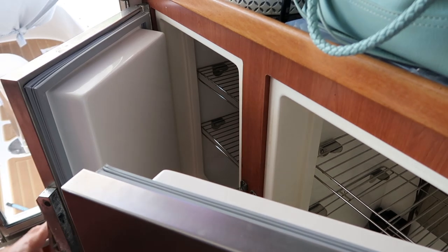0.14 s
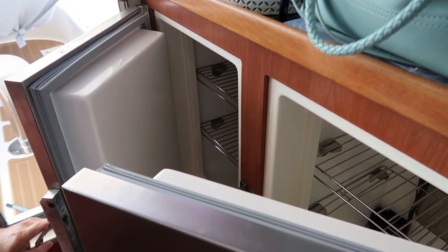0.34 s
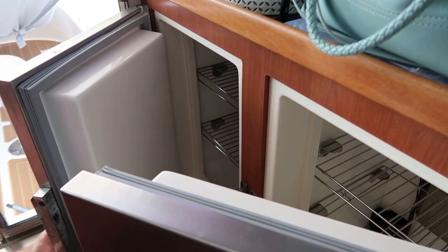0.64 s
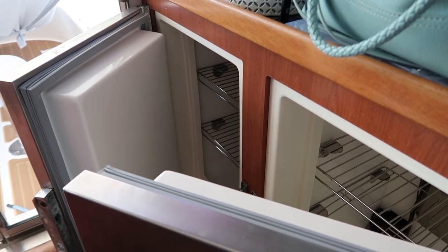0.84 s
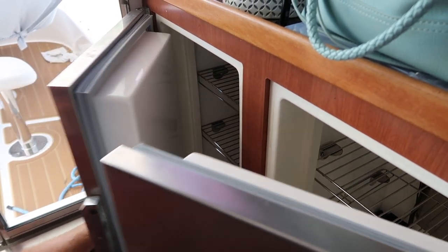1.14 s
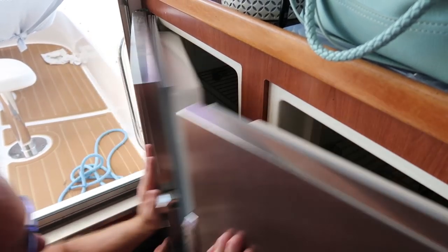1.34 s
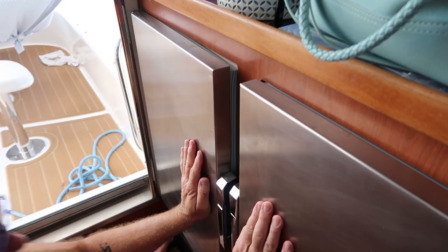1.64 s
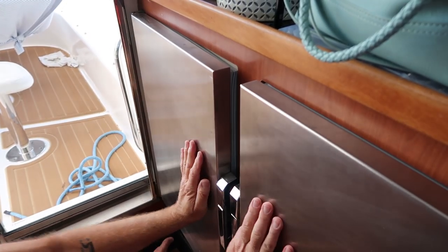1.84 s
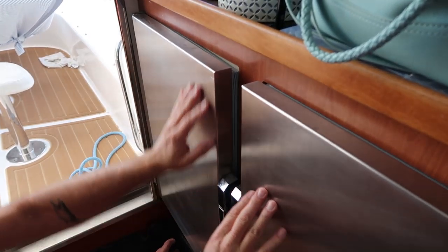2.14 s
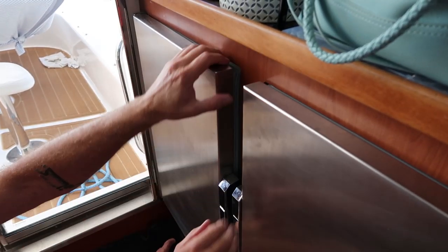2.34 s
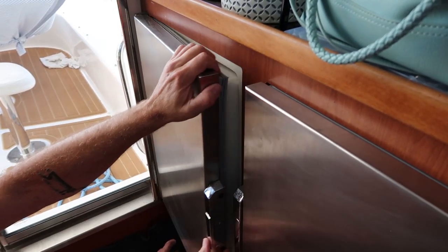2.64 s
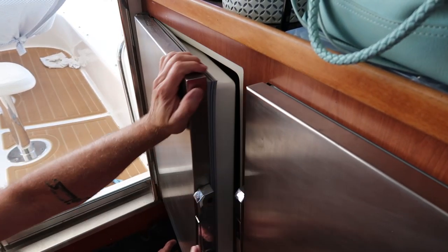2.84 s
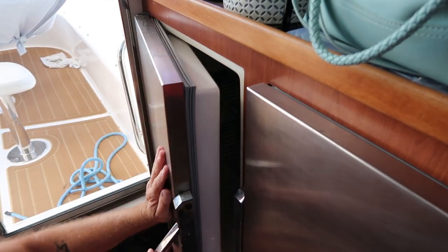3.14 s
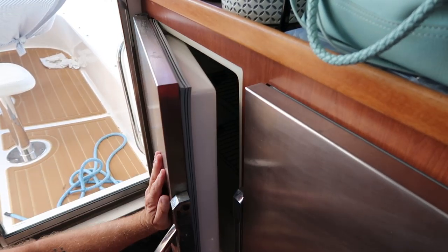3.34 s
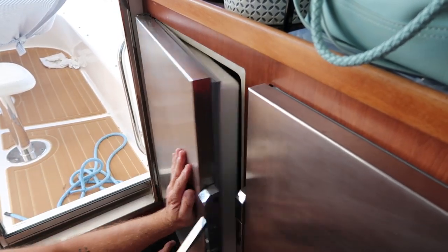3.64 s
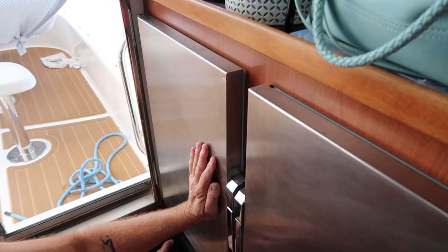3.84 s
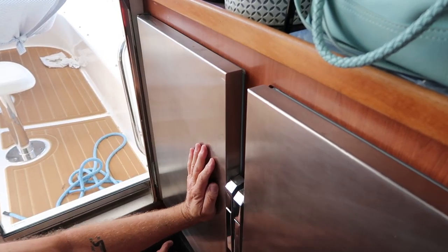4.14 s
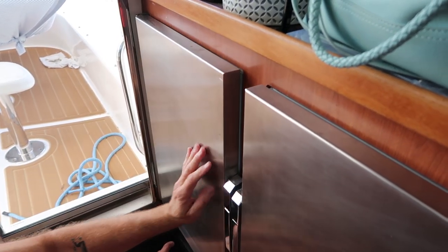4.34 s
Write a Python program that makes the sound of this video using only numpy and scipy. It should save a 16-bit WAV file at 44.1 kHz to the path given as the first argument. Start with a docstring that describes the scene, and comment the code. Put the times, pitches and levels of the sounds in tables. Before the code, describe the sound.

Low hum, soft airy rush and a very faint high whine fill a tight cabin. Latches click twice, then fridge doors slam with a boomy, distorted thud that makes the background dip. Later one latch is released with a bright click, the handle knocks lightly, a palm brushes the metal, and the door bangs shut, all very close and short, with little echo.

```python
"""A small wooden boat cabin with two steel-faced fridge doors: their latches snap, both doors are pushed shut
against stiff seals, then one is unlatched, swung open and shut again. Blows are damped ringing and noise bursts;
rubbing, a sliding hand, a low hum, a steady rush and a faint whine are shaped noise.
Loud blows overload the close microphone; the recorder's gain control ducks and lets the cabin swell slowly back."""
import sys
import numpy as np
from scipy import signal
from scipy.fft import rfft, irfft, next_fast_len
from scipy.io import wavfile

SR = 44100
rng = np.random.default_rng(int(sys.argv[2]) if len(sys.argv) > 2 else 0)


def materialize(psi):
    """Save the field psi as 16-bit PCM at rate SR to the path in sys.argv[1].

    A 1-D psi becomes a single channel; in a 2-D psi each row is a channel.
    """
    bounded = np.clip(np.atleast_2d(psi).T, -1, 1)
    quanta = np.round(bounded * 32767).astype(np.int16)
    wavfile.write(sys.argv[1], SR, quanta)


N = 197523
T = np.arange(SR // 3) / SR  # time within one blow, in seconds


def amp(db):
    """Turn decibels into a gain."""
    return 10 ** (np.asarray(db) / 20)


def unit(x):
    """Scale to rms 1."""
    return x / np.sqrt(np.mean(x ** 2) + 1e-20)


def blow(x):
    """Scale a blow to rms 0.1 over its third of a second, so that all blows start with equal energy."""
    return unit(x) / 10


def along(points, hz):
    """Read a curve of (f/Hz, value) points on a logarithmic frequency axis."""
    f, v = np.transpose(points)
    return np.interp(np.log(hz + 1), np.log(f), v)


def filtered(x, response):
    """Weight each frequency of x by the given response."""
    n = x.shape[-1]
    size = next_fast_len(n + 1024, True)
    hz = np.fft.rfftfreq(size, 1 / SR)
    return irfft(rfft(x, size) * response(hz), size)[..., :n]


def turn(hz):
    """Angle that sets how much of a sound the two channels share and how much is opposed."""
    # left-right likeness, from 1 (same) to below 0 (opposed): f/Hz, likeness
    likeness = [(300, 1), (1400, 0.97), (3100, .65), (6800, -.02), (10000, -0.46), (15000, -0.44)]
    return np.arccos(np.clip(along(likeness, hz), -1, 1)) / 2


def noise(spectrum, size, tilt_db=0):
    """Coloured stereo noise of rms 1: alike in the bass, spread wide in the treble."""
    def shared_and_opposed(hz):
        colour = amp(along(spectrum, hz) + tilt_db * np.log2(hz + 1))  # tilt in dB per octave
        return colour * [np.cos(turn(hz)), np.sin(turn(hz))]

    mid, side = filtered(rng.standard_normal((2, size)), shared_and_opposed)
    return unit(np.array([mid + side, mid - side]))


def ring(modes):
    """A struck object sounds many fading tones; the higher ones reach the two channels out of phase."""
    hz, db, t60 = np.transpose(modes)
    gain = amp(db + rng.standard_normal(len(hz)))  # each blow excites the tones a little differently
    lead = turn(hz) * rng.choice([-1, 1], len(hz))
    decay = np.log(1000) / t60  # a fall of 60 dB in t60 seconds
    waves = np.exp(np.outer(2j * np.pi * hz - decay, T).astype(np.complex64))
    starts = gain * np.exp(1j * np.array([lead, -lead]))
    return blow((starts @ waves).imag)


def add(track, s, x):
    """Mix x into the track from time s, in seconds."""
    part = track[:, round(s * SR):][:, :len(T)]
    part += x[..., :part.shape[1]]


def gestures(rows, attack_s, release_s):
    """Gain over time of (t/s, length/s, level/dB) events that rise before t, hold and fade."""
    t = np.arange(N) / SR
    gain = np.zeros(N)
    for s, length, db in rows:
        corners = [s - attack_s, s, s + length, s + length + release_s]
        gain += amp(db) * np.interp(t, corners, [0, 1, 1, 0])
    return gain


def lagged(x, seconds):
    """Smooth x so that it follows changes with the given time constant."""
    keep = np.exp(-1 / (seconds * SR))
    return signal.lfilter([1 - keep], [1, -keep], x)


def cabin(x, onset_s=0.0027):
    """Add the short answer of the wooden cabin: noise that dies away at its own pace at each pitch."""
    # how long the answer takes to fall by 60 dB: f/Hz, t60/s
    fade_times = [(80, 0.5), (250, 0.19), (1000, 0.2), (4000, 0.17), (12000, 0.17)]
    # strength of the reflected sound: f/Hz, level/dB
    walls = [(60, -13), (200, -4), (450, -5.5), (900, -7.5), (2000, -6), (6000, -9), (13000, -5.5)]
    hiss = noise([(20, 0.0078), (20000, 0)], len(T))  # practically white
    hz, t, bands = signal.stft(hiss, SR, nperseg=256)
    fade = amp(-60 * t / along(fade_times, hz)[:, None])
    tail = signal.istft(bands * fade, SR, nperseg=256)[1][:, :len(T)]
    build_up = 1 - np.exp(-(T / onset_s) ** 2)
    tail = unit(tail * build_up) / np.sqrt(len(T))
    tail = filtered(tail, lambda hz: amp(along(walls, hz)))
    # the left channel alone excites the answer, which is stereo
    return x + signal.fftconvolve(x[:1], tail, axes=1)[:, :len(T)]


def rush(level_db=-36.5):
    """A steady rush: noise strongest in the bass and lower middle."""
    # colour of the rush: f/Hz, level/dB
    rush_colour = [(53, -34), (90, -6), (220, -1.5), (323, -4.5), (352, -4.5), (452, -8), (501, -8.5),
                   (606, -12), (712, -6.5), (767, -13.5), (1110, -11), (1380, -16.5), (1510, -15.5),
                   (1740, -19.5), (3000, -25.5), (3900, -53), (6600, -120)]
    return amp(level_db) * noise(rush_colour, N)


def hiss_and_whine(level_db=-51, whine_db=-16):
    """A steady treble hiss, joined by a whine made of a narrow band of noise."""
    # colour of the hiss: f/Hz, level/dB
    hiss_colour = [(1290, -36.5), (2200, -3.5), (2750, -12), (3090, -4.5), (3290, -5), (3930, -8.5),
                   (4700, -4.5), (5360, -9), (6660, -9.5), (8530, -13.5), (12100, -11), (13100, -23.5),
                   (14000, -41)]
    # narrow peak of the faint whine: f/Hz, level/dB
    whine_colour = [(6300, -47), (6470, -15.5), (6525, 5), (6580, -13), (6750, -45), (7500, -120)]
    treble = noise(hiss_colour, N) + amp(whine_db) * noise(whine_colour, N)
    return amp(level_db) * treble


def hum(level_db=-39):
    """A low hum of narrow bass noise that swells as the doors are handled."""
    # colour of the hum: f/Hz, level/dB
    hum_colour = [(20, -30.5), (35, -24), (46, -6), (55, -4), (64, -1), (80, -33.5), (130, -23.5),
                  (250, -74)]
    # hum added while a door is handled: t/s, length/s, level/dB relative to the steady hum
    swells = [(0.0, 0.36, 2.5), (0.64, 0.25, 5.5), (2.78, 0.18, -17)]
    gain = 1 + gestures(swells, attack_s=0.031, release_s=0.04)
    return amp(level_db) * gain * noise(hum_colour, N)


def brush():
    """Skin slides over the steel with a faint, airy hiss."""
    # a hand sliding on the steel face: t/s, length/s, level/dB
    strokes = [(0.92, 0.11, -55), (2.12, 0.15, -58), (3.08, 0.098, -47.5)]
    level = gestures(strokes, attack_s=0.083, release_s=0.27)
    return level * noise([(4000, -16), (8000, -10.5), (11500, -2), (13000, -6), (14500, -25.5)], N)


def hinge():
    """The hinge sings faintly as the open door shifts: a soft, narrow rubbing tone near 715 Hz."""
    # the hinge's sound: t/s, length/s, level/dB
    hinge_moves = [(0.13, 0.073, -44.5)]
    level = gestures(hinge_moves, attack_s=0.03, release_s=0.038)
    return level * noise([(600, -80), (690, -26), (715, 15), (740, -18), (850, -72)], N)


def scuffs():
    """Seals and latch tongues rub harder and harder until they seat."""
    # rubbing that swells into a contact: end t/s, rise/s, level/dB, brightness/dB per octave
    rubs = [(0.332, .012, -28.5, 2), (0.6624, .018, -20.5, 5.5), (1.543, .03, -7.5, -1),
            (2.5915, 0.0096, -19, 2), (3.847, 0.054, -19, -4.5)]
    out = np.zeros((2, N))
    for end, rise, db, tilt_db in rubs:
        swell = amp(30 * np.minimum(T / rise - 1, 0)) * (T < rise)  # climbs 30 dB, then stops
        rub = noise([(100, -7.5), (700, -0.5), (3000, -9.5), (11000, -18), (15000, -27.5)], len(T), tilt_db)
        add(out, end - rise, cabin(amp(db) * swell * rub))
    return out


def body(part, dense_t60=0.06, modes_db=-4, cabinet_db=-13):
    """The struck part, the cabinet and the latch steel ring; levels are relative to the dense burst."""
    # quickly damped, crowded tones, by part: f/Hz, level/dB
    part_colours = { "catch": [(88, -35), (150, -10), (366, 0.5), (525, -23.5), (767, 2), (1000, -14.5),
                    (1380, -3.5), (1610, -4.5), (1940, 0.5), (2590, -10), (3370, -9.5), (5120, -14.5),
                    (5520, -13.5), (11800, -19.5), (14000, -37.5)], "bolt": [(88, -36.5), (150, -12.5),
                    (400, -5), (515, -16), (720, -1), (1000, -12), (1490, -6), (1640, -9), (2490, -11.5),
                    (3440, -6.5), (4300, -11), (4930, -20.5), (6310, -12), (7630, -15.5), (11800, -9.5),
                    (14000, -22)], "fridge": [(71, -25), (120, -9), (146, -19.5), (429, 2), (524, -15.5),
                    (627, 3), (1000, -4.5), (1260, -13.5), (1500, -6.5), (1950, -12.5), (2150, -10.5),
                    (2380, -15), (3760, -11), (4870, -21), (12200, -37.5), (14000, -46)],
                    "lever": [(120, -34), (200, -16), (366, -3), (430, -12.5), (682, -11), (772, -1.5),
                    (1180, -3), (1440, -9), (1850, -13.5), (3560, -9), (4110, -43), (4990, -8), (8820, -20),
                    (10500, -8.5), (14000, -25)], "handle": [(88, -27.5), (150, -13), (426, -2.5),
                    (566, -23), (767, -13), (950, -1), (1120, -7), (1440, -5.5), (1740, -22), (2180, -6),
                    (2350, -13), (2690, -13.5), (4840, -21.5), (5320, -15.5), (8880, -27), (11100, -18.5),
                    (14000, -41.5)], "door": [(71, -29), (120, 1), (338, -8.5), (484, -0.5), (690, 1),
                    (971, -3), (1050, -20), (1160, -10.5), (1260, -30), (1500, -14), (1950, -11.5),
                    (2480, -7.5), (4500, -9), (5950, -23.5), (11900, -19.5), (14000, -36)], }
    # strongest single tones, by part: f/Hz, level/dB, t60/s
    part_modes = { "catch": [(310.7, -7.5, 0.071), (750, -8, 0.11), (1170, -15.5, 0.048),
                  (1278.7, -8.5, 0.1), (1490, -4.5, 0.031), (1527, 8.5, 0.028), (1783, 4.5, 0.007),
                  (2196, -7.5, 0.12), (2656, -16.5, 0.059), (3028, -18.5, 0.014), (3680, -12, 0.023)],
                  "bolt": [(294.4, -8, 0.11), (422, -7, 0.1), (750, 6, 0.031), (1180, 1, 0.039),
                  (1500, -7.5, 0.043), (3480, -6, 0.05), (3233, 4, 0.021), (4185, -7.5, 0.045),
                  (4480, -2.5, 0.067), (9430, -7.5, 0.04), (10520, -7, 0.045)],
                  "fridge": [(334, -10, 0.099), (434, -7.5, 0.05), (664, 15, 0.06), (707, -0.5, 0.044),
                  (870, 2.5, 0.021), (1050, -9, 0.07), (1497, 3, 0.085), (2000, -17.5, 0.06),
                  (3190, -14, 0.036), (3624, -18, 0.12), (4170, -15.5, 0.05)], "lever": [(440, -6, 0.15),
                  (830, -4.5, 0.04), (1120, -8.5, 0.078), (1270, -13, 0.046), (1330, 4, 0.013),
                  (1452, 3, 0.073), (3150, -5, 0.044), (3460, -1, 0.008), (6640, -2.5, 0.05),
                  (10100, -6, 0.05), (10540, -2, 0.04)], "handle": [(310, -5, 0.076), (434, 3.5, 0.086),
                  (798, 0.5, 0.068), (923, -13, 0.059), (1086, -3, 0.055), (1110, -14, 0.083),
                  (1550, -27, 0.05), (2067, -1, 0.059), (2180, -3, 0.04), (2490, -4.5, 0.071),
                  (2520, -27, 0.05)], "door": [(216, -14.5, 0.024), (314.6, -7, 0.05), (600, -1.5, 0.05),
                  (830, -8, 0.043), (920, 0, 0.021), (1137, 0.5, 0.071), (1466, -4, 0.042),
                  (1557, -1, 0.058), (1740, -13.5, 0.05), (3040, -7, 0.036), (4430, -16, 0.065)], }
    # tones of the cabinet: f/Hz, level/dB, t60/s
    cabinet_modes = [(121, -7.5, 0.29), (208, -16.5, 0.35), (432, -4.5, 0.12), (630, -5, 0.18),
                     (1047, -10, .13), (2090, -13, 0.11)]
    # tones of the latch metal: f/Hz, level/dB, t60/s
    steel_modes = [(3130, -6, 0.061), (3392, -4.5, 0.12), (4300, -13, 0.078), (5930, -5.5, 0.08),
                   (6400, -12, 0.23), (6570, -9.5, .12), (7146, -13, 0.09), (9860, -9, 0.11),
                   (9900, -14, 0.11), (10500, -6, 0.11), (10700, -11, .09), (11700, -10.5, 0.1),
                   (12200, -5.5, .09)]
    # strength of the latch ring, by part: level/dB
    steel_share = {"catch": -20, "bolt": -12.5, "fridge": -22, "lever": -15, "handle": -18, "door": -12.5}
    # many overlapping, damped tones blur into a short coloured burst
    dense = blow(noise(part_colours[part], len(T)) * amp(-60 * T / dense_t60))
    modes = amp(modes_db) * ring(part_modes[part])
    cabinet = amp(cabinet_db) * ring(cabinet_modes)
    steel = amp(steel_share[part]) * ring(steel_modes)
    return dense + modes + cabinet + steel


def crack(t60=0.065):
    """The sharp, bright crack of a contact: a fast-fading noise burst."""
    # colour of the crack: f/Hz, level/dB
    crack_colour = [(300, -6), (1200, -0.5), (3300, -5.5), (5000, -4.5), (6300, -4), (8300, -9),
                    (10300, -6), (12000, -5), (13500, -16), (15500, -30)]
    return blow(noise(crack_colour, len(T)) * amp(-60 * T / t60))


def thump(hz, cycles=8.2):
    """The cabinet thumps: one tone that starts softly and falls by 60 dB in a few cycles."""
    decay = amp(-60 * T * hz / cycles)
    build_up = 1 - np.exp(-T * hz * 2)
    return blow(np.sin(2 * np.pi * hz * T) * decay * build_up)


def contacts():
    """Each contact rings its part and the latch steel, cracks and thumps the cabinet."""
    # contacts of doors and latches: t/s, part, body level/dB, crack level/dB, thump level/dB, thump f/Hz
    hits = [ (0.334, "catch", -4, -14, -22.5, 320), (0.338, "catch", -5.5, -16.5, -29.5, 130),
            (0.6608, "bolt", 6.5, -9.5, -26, 280), (0.665, "bolt", -3.5, 0.5, -7, 121),
            (1.5402, "fridge", 11.5, -13, 2.5, 325), (1.5445, "fridge", 8, 3.5, -9, 216),
            (1.5484, "fridge", 15.5, 5.5, 10, 65.3), (1.589, "fridge", -22, -20, -4, 72),
            (2.5934, "lever", -3, -1, -37.5, 272), (2.5973, "lever", 2.5, -9.5, -27, 115),
            (3.0775, "handle", -2.5, -23, -8, 1020), (3.086, "handle", -13, -25.5, -19.5, 128),
            (3.1, "handle", -15.5, -36, -18, 183), (3.836, "door", -30, -45.5, -28, 1133),
            (3.847, "door", -7, -19, -11, 1046), (3.853, "door", 2, -16.5, -4.5, 60),
            (3.8556, "door", 2.5, -16, 8, 330), (3.861, "door", 8.5, 13.5, 2.5, 446), ]
    out = np.zeros((2, N))
    for s, part, body_db, crack_db, thump_db, thump_hz in hits:
        hit = amp(body_db) * body(part)
        hit = hit + amp(crack_db) * crack()
        hit = hit + amp(thump_db) * thump(thump_hz)
        add(out, s, cabin(hit))
    return out


def scene():
    """Doors, latches, a hinge and a sliding hand over the cabin's background."""
    background = rush() + hiss_and_whine() + hum()
    return background + brush() + hinge() + scuffs() + contacts()


def gain_control(x, threshold_db=-9.5, recover_db_per_s=8.5, detect_s=0.0027, duck_s=0.0016):
    """The gain drops quickly by whatever exceeds the threshold, then climbs back at a steady rate."""
    power = lagged(np.mean(x ** 2, axis=0), detect_s)
    level_db = 10 * np.log10(power + 1e-12)
    excess_db = np.maximum(level_db - threshold_db, 0)
    climb_db = recover_db_per_s * np.arange(N) / SR
    # hold the largest excess so far, less the recovery since then
    duck_db = np.maximum.accumulate(excess_db + climb_db) - climb_db
    return x * amp(-lagged(duck_db, duck_s))


def record(dry, bottom_hz=20, top_hz=15650):
    """Gain control; peaks that slip past it are rounded off at full scale, then the band is limited."""
    held = gain_control(dry)
    clipped = held / (1 + np.abs(held) ** 6) ** (1 / 6)

    def band(hz):
        low_cut = (1j * hz / (1j * hz + bottom_hz)) ** 2
        high_cut = 1 / (1 + (hz / top_hz) ** 150)  # a very steep edge
        return low_cut * high_cut

    return filtered(clipped, band)


dry = scene()
out = record(dry)
materialize(out)
```